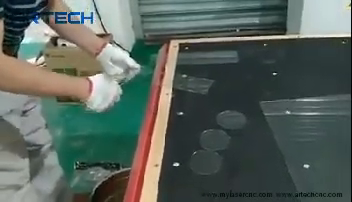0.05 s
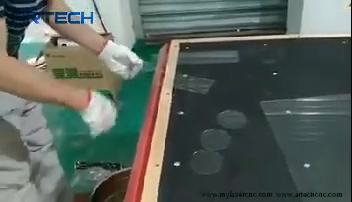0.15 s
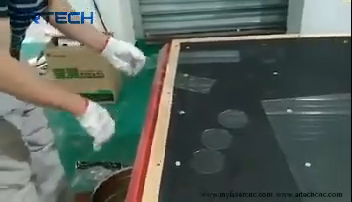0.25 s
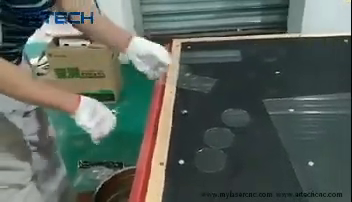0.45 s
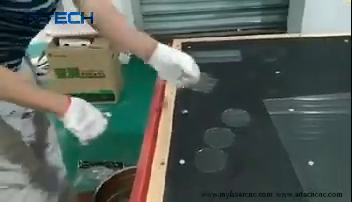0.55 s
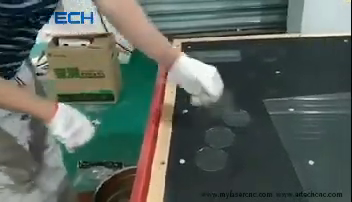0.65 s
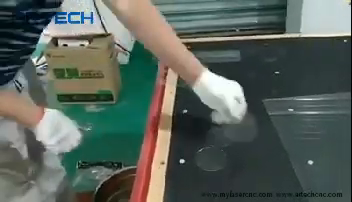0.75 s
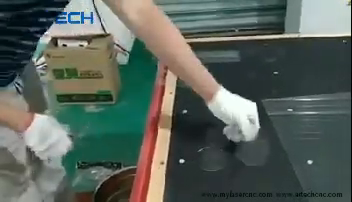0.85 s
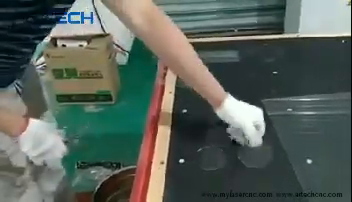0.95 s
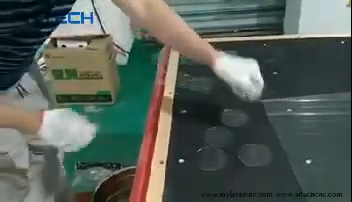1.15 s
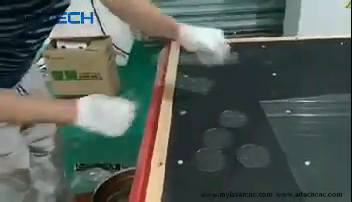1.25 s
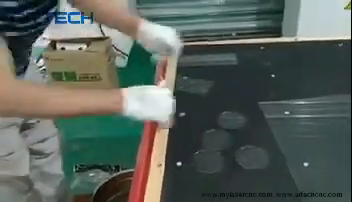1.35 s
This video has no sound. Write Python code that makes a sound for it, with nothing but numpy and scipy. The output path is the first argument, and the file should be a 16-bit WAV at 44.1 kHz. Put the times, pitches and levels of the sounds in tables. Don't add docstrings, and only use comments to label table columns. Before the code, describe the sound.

Glass clinking: after quiet workshop rumble, hum and faint hiss, an offcut strikes a scrap heap at 0.21 s with a loud, brittle, bright crash of quick contacts. Shards slide and rattle, thinning by 0.5 s. At 0.69 s a glass disc lands with a duller, quickly damped clack and padded knock, then gritty grinding, small rocks and a tick at 0.84 s. Hall echo lingers as blower hiss rises slightly.

```python
import sys
import numpy as np
from scipy import signal
from scipy.fft import rfft, irfft, next_fast_len
from scipy.io import wavfile
from scipy.ndimage import uniform_filter1d

SR = 44100
rng = np.random.default_rng(int(sys.argv[2]) if len(sys.argv) > 2 else 0)


def wrap_up_sound(samples):
    columns = np.atleast_2d(samples).T
    tamed = np.clip(columns, -1, 1)
    steps = np.round(tamed * 32767).astype(np.int16)
    wavfile.write(sys.argv[1], SR, steps)


def invert_db(level):
    return 10 ** (np.asarray(level, dtype=float) / 20)


N = 61739


def rms_one(x):
    return x / np.sqrt(np.mean(x ** 2) + 1e-20)


def at_hz(points, hz):
    table_hz, value = np.transpose(points)[:2]
    return np.interp(np.log(hz), np.log(table_hz), value)


def coloured(x, points):
    size = next_fast_len(N + 2048)
    gain = invert_db(at_hz(points, np.fft.rfftfreq(size, 1 / SR) + 1))
    return irfft(rfft(x, size) * gain, size)[..., :N]


def filtered(x, order, hz, kind):
    return signal.sosfilt(signal.butter(order, hz, kind, fs=SR, output="sos"), x)


def ring(clicks, hz, t60_s):
    r = invert_db(-60 / (t60_s * SR))
    w = 2 * np.pi * hz / SR
    return signal.lfilter([0, np.sin(w)], [1, -2 * r * np.cos(w), r * r], clicks + 1e-18)


def swell(start_s, hz, t60_s):
    t = np.arange(N) / SR
    push = np.sin(np.pi * np.clip((t - start_s) / 0.002, 0, 1))
    return ring(push * np.sin(2 * np.pi * hz * t) / 28, hz, t60_s)


def struck(hits, modes, spread_db, crack_db):
    crack_s = 0.0015
    start_s, peak_db, tilt_db_per_octave = np.transpose(hits)
    at = (start_s * SR).astype(int)
    luck = rng.standard_normal((len(hits), len(modes)))
    ringing = np.zeros(N)
    for k, (hz, level_db, t60_s) in enumerate(modes):
        strength_db = peak_db - 6 + level_db + tilt_db_per_octave * np.log2(hz / 4000)
        clicks = np.zeros(N)
        clicks[at] = invert_db(strength_db + spread_db * luck[:, k]) * (-1) ** k
        ringing += ring(clicks, hz, t60_s)
    burst = np.zeros(N)
    burst[at] = invert_db(peak_db + crack_db)
    envelope = signal.lfilter([1], [1, -np.exp(-1 / (crack_s * SR))], burst + 1e-18)
    return ringing + filtered(envelope * rng.standard_normal(N), 2, 2000, "high")


# pitch_hz [Hz], density_db [dB per Hz]
AIR = [(28, -37), (44, -2), (130, -9.5), (300, -18.5), (600, -22), (2200, -12.5), (3300, -16.5),
       (4600, -28.5)]
# pitch_hz [Hz], width_hz [Hz], level_db [dB]
HUM = [(47.2, 3.6, -50), (124.7, 11, -56.5), (213.2, 4.3, -66.5), (813, 13, -71)]
# start_s [s], gain_db [dB]
BLOWER_RUN_UP = [(0, -0.5), (.7, 1.5), (1.4, 5)]


def workshop():
    air_db, hiss_db, hiss_top_db, roar_db = -45, -60, -61.5, -61.5
    air = invert_db(air_db) * rms_one(coloured(rng.standard_normal(N), list(AIR) + [(9000, -60)]))
    drive = rng.standard_normal(N + SR)
    hum = sum(invert_db(db) * rms_one(ring(drive, hz, 2.2 / width_hz)[SR:]) for hz, width_hz, db in HUM)
    white = rng.standard_normal((3, N))
    hiss = invert_db(hiss_db) * rms_one(filtered(white[0], 4, [4500, 8740], "band"))
    hiss_top = invert_db(hiss_top_db) * white[1]
    roar = invert_db(roar_db) * rms_one(filtered(white[2], 2, [250, 1100], "band"))
    blower = invert_db(np.interp(np.arange(N) / SR, *np.transpose(BLOWER_RUN_UP)))
    return air + hum + blower * (hiss + hiss_top + roar)


# pitch_hz [Hz], t60_s [s]
HALL_T60 = [(310, 1.84), (1050, 1.65), (2550, 1.69), (6050, 0.96), (10100, 0.91), (15100, 0.34)]


def hall(x):
    gap_s, build_s = 0.0023, 0.0082
    t = np.arange(N) / SR
    edges_hz = 200 * 2 ** np.arange(0, 6.6, 0.5)
    white = rng.standard_normal((2, N))
    tail = np.zeros(N)
    for k, (low_hz, high_hz) in enumerate(zip(edges_hz, edges_hz[1:])):
        band = filtered(white[k % 2], 2, [low_hz, high_hz], "band")
        tail += band * invert_db(-60 * t / at_hz(HALL_T60, np.sqrt(low_hz * high_hz)))
    tail *= 1 - np.exp(-np.maximum(t - gap_s, 0) / build_s)
    return signal.fftconvolve(x, tail / np.sqrt(np.sum(tail ** 2)))[:N]


def table():
    level_db, t60_s = -34.5, 0.24
    age_s = np.arange(N) / SR - DISC_HITS[0][0]
    noise = rms_one(filtered(rng.standard_normal(N), 3, [330, 1658], "band"))
    return invert_db(level_db) * noise * (age_s > 0) * invert_db(-60 * np.maximum(age_s, 0) / t60_s)


# start_s [s], peak_db [dB], tilt_db_per_octave [dB per octave]
DISC_HITS = [
    (0.6867, -14, -0.75),
    (.6883, -16.5, 2.9),
    (0.6997, -25, 7.5),
    (0.7195, -28, -4),
]
# pitch_hz [Hz], level_db [dB], t60_s [s]
DISC = [(420, -10, .035), (802, -14, .02), (1390, -16, .015), (1950, -14, .02), (2598, 0, .08),
        (4800, -3, .009), (6040, -2, .03), (7780, -8, .009), (10200, -17, .009), (12410, -12, .008),
        (13540, -14, .014), (15200, -16, .025)]
# start_s [s], peak_db [dB]
TICK = [
    (.8395, -27),
]
# pitch_hz [Hz], level_db [dB], t60_s [s]
TICK_MODES = [(5000, 0, .016), (7600, -6, .009), (12800, -9, .008), (10500, -12, .007), (14200, -12, .007)]
# start_s [s], peak_db [dB]
ROCKS = [
    (0.7114, -32),
    (0.747, -29),
    (.7630, -23.5),
    (0.78, -28.5),
    (0.819, -32.5),
    (.853, -28.5),
]
# pitch_hz [Hz], level_db [dB]
GRIT = [(1500, -22), (2600, -8), (4000, -12), (7500, 1), (10500, -6), (15300, -12)]


def disc():
    crack_db, damped_after_s, damped_db = -8, 0.0061, -19
    grind_db, grind_t60_s, grind_modes_db, rock_t60_s = -36.5, 0.48, -6, 0.03
    hits = np.array(DISC_HITS)
    age_s = np.arange(N) / SR - hits[0, 0] - damped_after_s
    glove = invert_db(damped_db * np.clip(age_s / 0.0015, 0, 1))
    landing = struck(hits[:2], DISC, 0, crack_db) * glove
    touches = struck(hits[2:], DISC, 2.5, crack_db)
    tick = struck([(start_s, db, 0) for start_s, db in TICK], TICK_MODES, 0, -3)
    main_hz = DISC[4][0]
    rocks = sum(invert_db(db) * swell(start_s, main_hz, rock_t60_s) for start_s, db in ROCKS)
    roughness_db = 3 * rng.standard_normal(N // 100 + 1).repeat(100)[:N]
    grit = rng.standard_normal(N) * invert_db(roughness_db)
    through_modes = rms_one(sum(invert_db(db) * ring(grit, hz, min(t60_s, 0.04)) for hz, db, t60_s in DISC[4:]))
    grind = rms_one(coloured(grit, GRIT)) + invert_db(grind_modes_db) * through_modes
    pressed = age_s > 0
    grind *= pressed * invert_db(grind_db - 60 * age_s / grind_t60_s * pressed)
    return landing + touches + tick + rocks + grind


# start_s [s], level_db [dB]
RATTLE = [
    (0.2134, -29),
    (.232, -37.5),
    (.28, -41),
    (.31, -38),
    (.35, -38),
    (0.399, -44.5),
    (.47, -52.5),
    (0.582, -60),
]
# start_s [s], level_db [dB], length_s [s]
SOFT_KNOCKS = [
    (0.219, -31.5, 0.0088),
    (0.241, -31.5, 0.0077),
    (0.258, -29.5, 0.0079),
]
# start_s [s], peak_db [dB], pitch_hz [Hz], t60_s [s]
CHINKS = [
    (0.2565, -16, 7000, 0.019),
    (.322, -30, 3520, 0.072),
    (0.34, -27, 2950, 0.042),
    (0.357, -22, 2300, 0.1),
    (0.368, -27.5, 2710, .07),
]
# pitch_hz [Hz], level_db [dB]
HEAP = [(1800, -23.5), (2250, -4), (3400, 0), (4200, -9), (6900, -0.5), (9000, -5), (12500, -8), (15500, 2)]


def shards():
    clicks_per_s, spread_db, ring_cycles, offcut_modes_db = 11000, 2.5, 48, -3.5
    t = np.arange(N) / SR
    level = invert_db(np.interp(t, *np.transpose(RATTLE), left=-120, right=-120))
    for start_s, db, length_s in SOFT_KNOCKS:
        level += invert_db(db) * np.sin(np.pi * np.clip((t - start_s) / length_s, 0, 1)) ** 2
    happens = rng.random(N) < clicks_per_s / SR
    strength = invert_db(spread_db * np.minimum(rng.exponential(1, N), 4))
    clicks = rms_one(happens * strength * rng.choice([-1, 1], N)) * level
    pitches_hz = np.geomspace(1800, 15600, 50) * (1 + 0.012 * rng.standard_normal(50))
    pieces = [(hz, at_hz(HEAP, hz) + 3 * np.log2(hz / 3000), ring_cycles / hz) for hz in pitches_hz]
    pieces += [(hz, offcut_modes_db + db, 2 * t60_s) for hz, db, t60_s in OFFCUT[:5]]
    dealt = rng.integers(0, len(pieces), N)
    out = np.zeros(N)
    for k, (hz, db, t60_s) in enumerate(pieces):
        out += invert_db(db) * ring(clicks * (dealt == k), hz, t60_s)
    for start_s, db, hz, t60_s in CHINKS:
        out += invert_db(db) * swell(start_s, hz, t60_s)
    return out


# start_s [s], peak_db [dB], tilt_db_per_octave [dB per octave]
OFFCUT_HITS = [
    (.2085, -14.5, 2.5),
    (.2098, -8.5, 2.5),
    (.2112, -10.5, -2),
    (0.2127, -13.5, -1.5),
]
# pitch_hz [Hz], level_db [dB], t60_s [s]
OFFCUT = [(2023, -10, 0.016), (2303, -4.5, 0.041), (2766, -8, 0.039), (2934, -6, 0.039),
          (3433, -12.5, 0.03), (5550, -0.5, 0.0099), (5754, -3, 0.022), (6670, -5, 0.011),
          (7380, -11, .025), (9720, -5, 0.0088), (10780, -12, .012), (13330, -2.5, 0.024),
          (13145, 1, 0.0099), (14300, -4, 0.0092)]


def offcut():
    blow = struck(OFFCUT_HITS, OFFCUT, spread_db=2.0, crack_db=-7.5)
    return filtered(blow + shards(), 3, 1500, "high")


def scene():
    offcut_hall_db, disc_hall_db = -3, -9
    background = workshop()
    laid = disc() + table()
    tossed = offcut()
    wet = hall(invert_db(offcut_hall_db) * tossed + invert_db(disc_hall_db) * laid)
    return (background + laid + tossed + wet)[None]


def low_pass(x):
    return signal.sosfilt(signal.butter(12, 16800, fs=SR, output="sos"), x)


# pitch_hz [Hz], gain_db [dB]
MIC = [(1250, 0.57), (2650, -1.4), (4400, -5), (7200, -0.3), (8120, -1.4), (8550, -9.5), (10100, -2.6),
       (15100, -4.4)]


def record(dry):
    duck_from_db, duck_share, release_db_per_s, attack_s = -25, 0.69, 69, 0.0073
    x = coloured(dry, MIC)
    power = uniform_filter1d(x[0] ** 2, size=220, origin=109)
    over_db = np.maximum(10 * np.log10(power + 1e-12) - duck_from_db, 0)
    released_db = release_db_per_s * np.arange(N) / SR
    held_db = np.maximum.accumulate(duck_share * over_db + released_db) - released_db
    r = np.exp(-1 / (attack_s * SR))
    x = x * invert_db(-signal.lfilter([1 - r], [1, -r], held_db))
    x = signal.sosfilt(signal.cheby2(14, 50, 15880, fs=SR, output="sos"), x)
    return low_pass(x)


dry = scene()
out = record(dry)
wrap_up_sound(out)
```